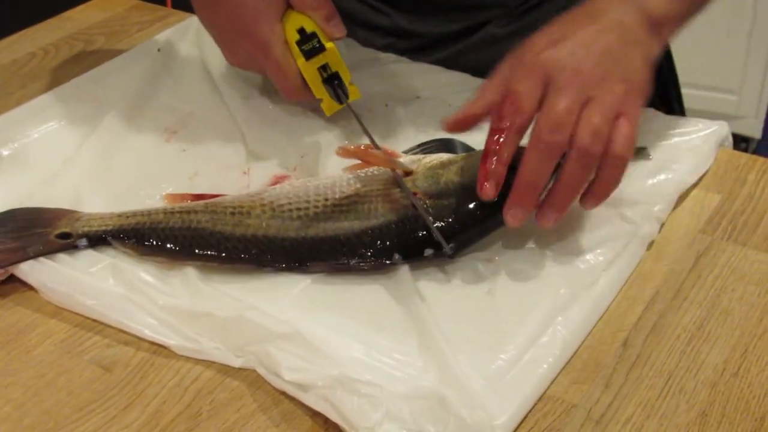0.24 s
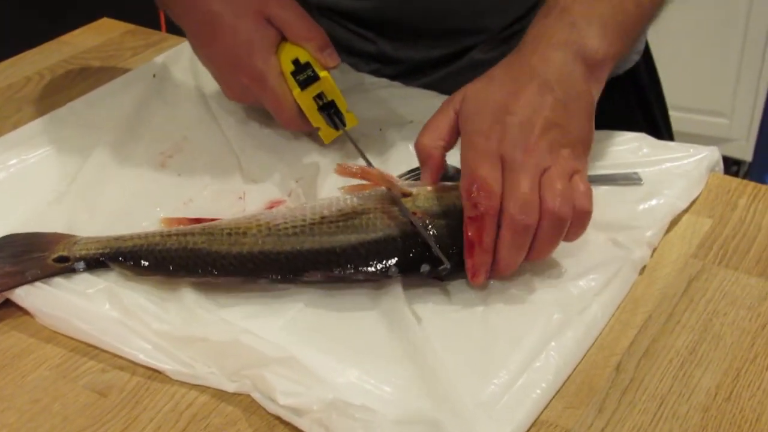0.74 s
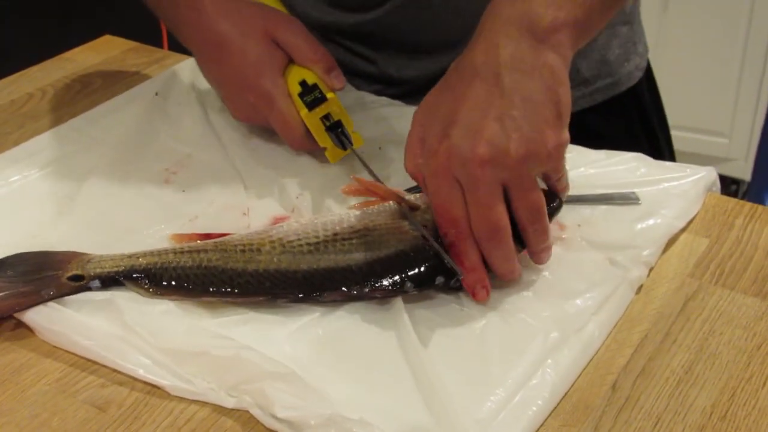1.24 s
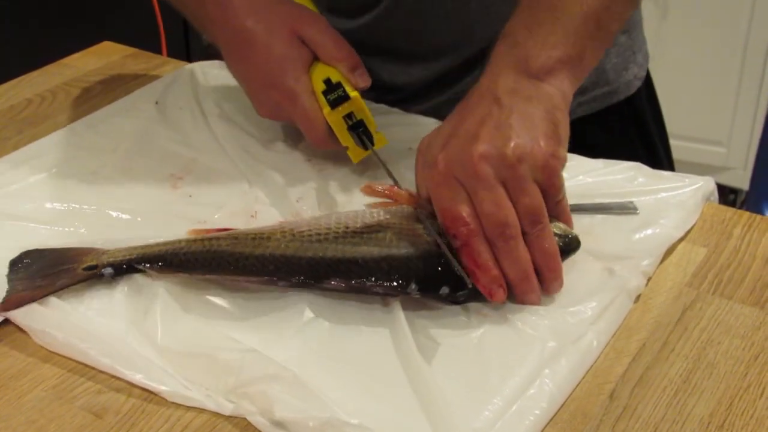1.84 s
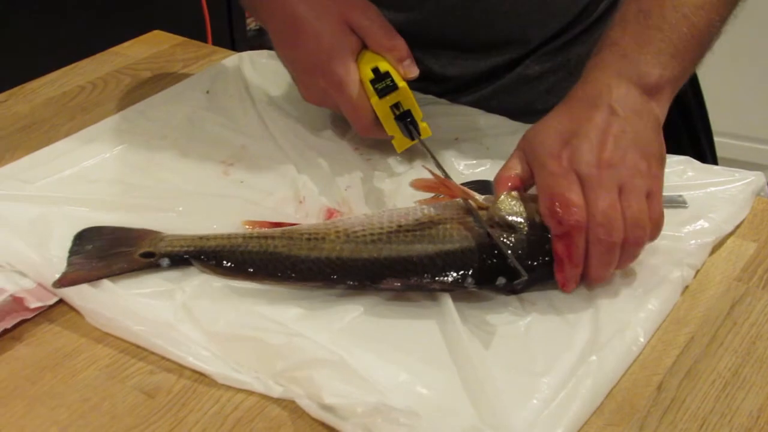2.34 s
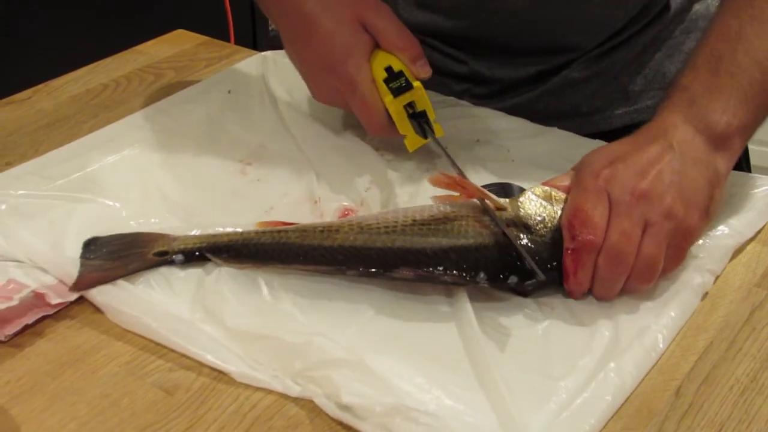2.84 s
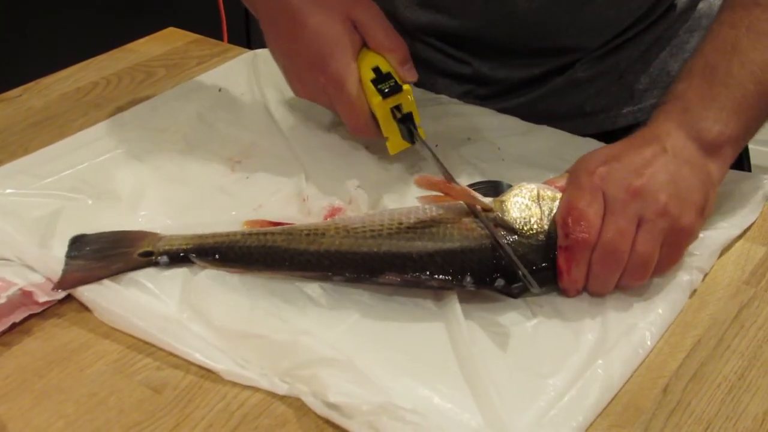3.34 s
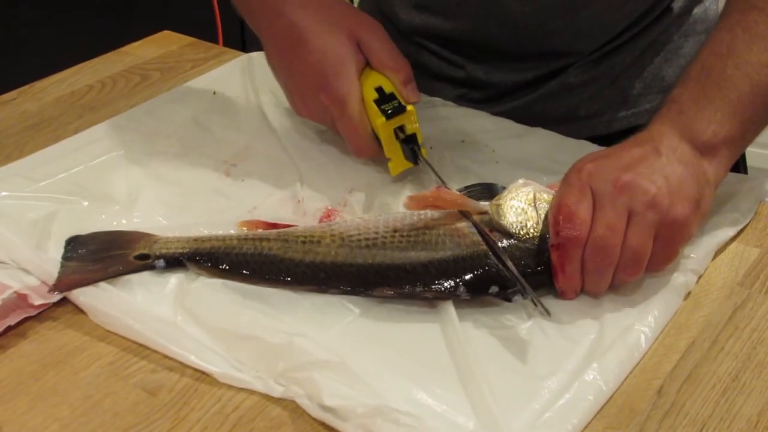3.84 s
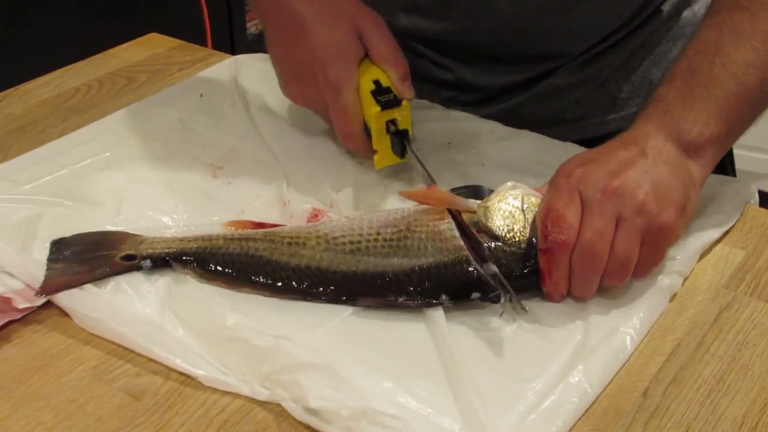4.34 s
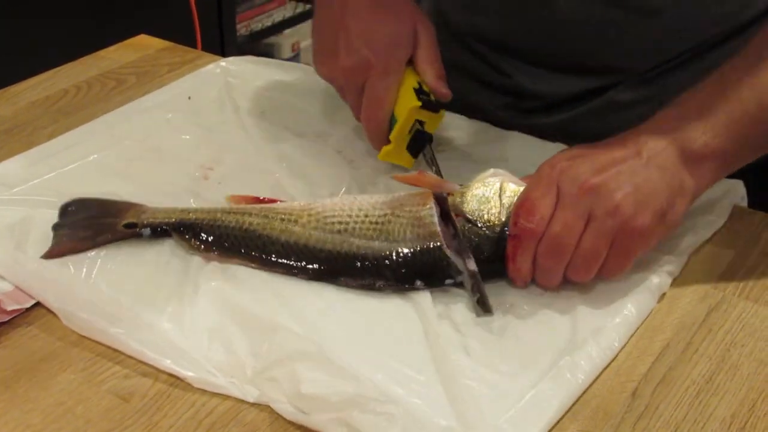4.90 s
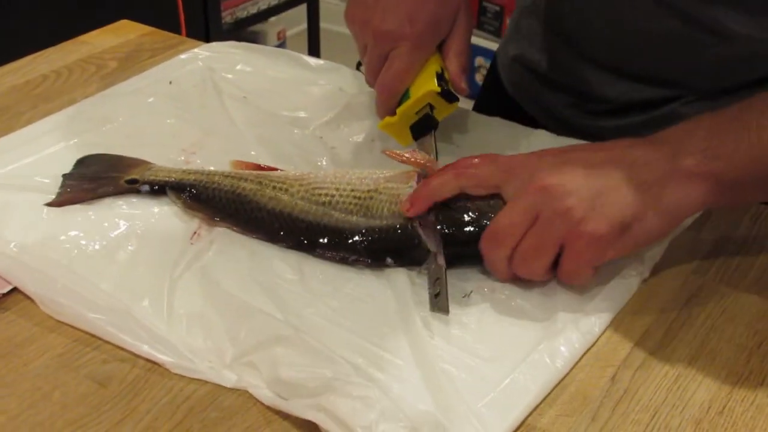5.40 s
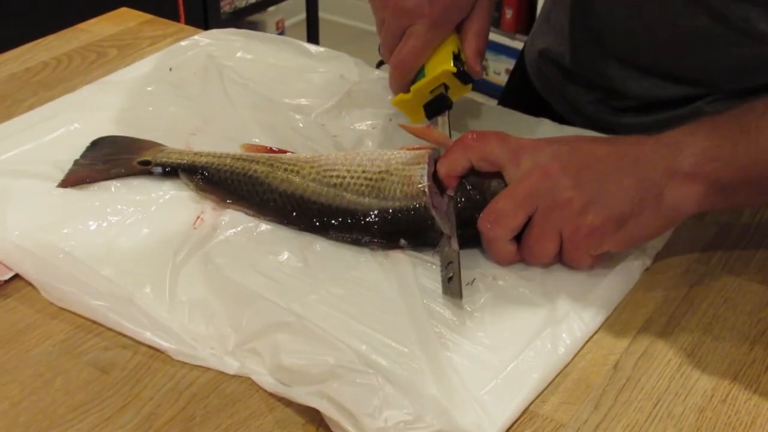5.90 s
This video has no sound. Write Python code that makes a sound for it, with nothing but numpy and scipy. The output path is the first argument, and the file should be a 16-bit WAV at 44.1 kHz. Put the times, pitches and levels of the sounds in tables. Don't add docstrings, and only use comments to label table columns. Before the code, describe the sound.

Close in a small kitchen, a corded electric knife coasts down, hands shift fish on crackling plastic, then short whining bursts saw and clatter before slowing.

```python
import sys
import numpy as np
from scipy import signal
from scipy.fft import rfft, irfft, next_fast_len
from scipy.io import wavfile
from scipy.ndimage import uniform_filter1d, map_coordinates

SR = 44100
rng = np.random.default_rng(int(sys.argv[2]) if len(sys.argv) > 2 else 0)


def volts_from_decibels(level):
    exponent = np.asarray(level, float) / 20
    return 10 ** exponent


def transcribe(u):
    v = np.clip(np.atleast_2d(u).T, -1, 1)
    q = np.round(v * 32767).astype(np.int16)
    wavfile.write(sys.argv[1], SR, q)


N = 271656

TOP_HZ = 15200
TOP_BARS_HZ = 3060
BARS_PER_STROKE, BARS_PER_TURN = 41, 12


def noise():
    return rng.standard_normal(N)


def unit(x):
    return x / np.sqrt(np.mean(x ** 2) + 1e-20)


def levelled(x):
    return x / np.sqrt(np.abs(uniform_filter1d(x ** 2, int(.06 * SR))) + 1e-12)


def along(points, hz):
    f, v = np.transpose(points)
    return np.interp(np.log(hz + 1), np.log(f + 1), v)


def curves(*tables):
    s, *cols = np.transpose(sorted(row for table in tables for row in table))
    t = np.arange(N) / SR
    sounds = sum((t > table[0][0] - .015) & (t < table[-1][0] + .015) for table in tables)
    return [np.where(sounds, np.interp(t, s, c), -100) for c in cols]


def swells(times, db, rise_s, fall_s):
    late = np.arange(0, N + 64, 64) / SR - np.array(times)[:, None]
    drop = np.where(late < 0, -late / np.abs(rise_s)[:, None], late / np.abs(fall_s)[:, None])
    power = np.sum(volts_from_decibels(db[:, None] - 20 * drop) ** 2, axis=0)
    return np.interp(np.arange(N), 64 * np.arange(len(power)), np.sqrt(power))


def wobble(rate_hz):
    coarse = np.arange(0, N + 16, 16)
    knots = rng.standard_normal(int(N * rate_hz / SR) + 4)
    return np.interp(np.arange(N), coarse, map_coordinates(knots, [coarse * rate_hz / SR]))


def filtered(x, response):
    m = next_fast_len(N + SR // 8, True)
    return irfft(rfft(x, m) * response(np.fft.rfftfreq(m, 1 / SR)), m)[..., :N]


def shaped(x, points):
    return filtered(x, lambda f: volts_from_decibels(along(points, f)))


def modes(table):
    return lambda f: sum((-1) ** k * volts_from_decibels(db) * 1j * f * w / (c * c - f * f + 1j * f * w)
                         for k, (c, w, db) in enumerate(table))


def bursts(times, sizes, t60):
    kicks = np.bincount(np.minimum((np.asarray(times) * SR).astype(int), N - 1), sizes, N)
    decay = signal.lfilter([1], [1, -volts_from_decibels(-60 / (t60 * SR))], kicks)
    return uniform_filter1d(decay, int(.0012 * SR))


def spread(mid, side, width):
    side = shaped(side, width)
    return np.array([mid + side, mid - side])


# pitch_hz, level_db
FRIDGE_HUM = [(123.8, -60.5), (242.2, -56.5), (296.1, -58.5), (419.9, -64.5)]


def fridge():
    t = np.arange(N) / SR
    return sum(volts_from_decibels(db + 1 + 2.0 * wobble(5.02)) * np.sin(2 * np.pi * hz * t + wobble(7.4))
               for hz, db in FRIDGE_HUM)


# freq_hz, density_db_per_hz
AIR_SPECTRUM = [(15, -46), (25, -20), (42, -18), (60, -6), (107, -3.5), (169, -3), (240, -1), (368, -4.5),
                (457, -0.5), (560, -4), (666, -25.5), (741, -11), (1110, -12), (1620, -23.5), (3170, -25.5),
                (10100, -26.5), (13200, -43), (15500, -39)]
# freq_hz, side_mid_db
AIR_WIDTH = [(60, 7.5), (180, 5.5), (550, -4), (1650, 0), (3500, -14), (7000, -4), (9000, -26),
             (15000, -22)]


def room_air():
    mid, side = shaped(rng.standard_normal((2, N)), AIR_SPECTRUM)
    return volts_from_decibels(-47 + 0.36 * wobble(3.3)) * unit(spread(mid, side, AIR_WIDTH))


# freq_hz, t60_s
KITCHEN_T60 = [(150, 0.64), (1000, 0.18), (10000, 0.11)]


def kitchen(x):
    hz, t, z = signal.stft(rng.standard_normal((2, SR // 2)), SR, nperseg=256)
    tail = signal.istft(z * volts_from_decibels(-60 * t / along(KITCHEN_T60, hz)[:, None]), SR, nperseg=256)[1]
    return signal.fftconvolve(x[None], tail / np.linalg.norm(tail[0]), axes=1)[:, :N]


# peak_s, rustle_db, rub_db, rise_s, fall_s (per 20 dB)
HAND_MOVES = [(1.134, -56, -58, 0.04, 0.3), (1.4, -60.5, -61.5, 0.41, 0.7), (1.536, -54, -56, 0.063, 0.05),
              (1.646, -52.5, -57.5, 0.074, 0), (1.77, -45.5, -49, 0.013, 0.06), (1.92, -46, -52, 0.25, 0.1),
              (2.005, -47, -47, .006, 0.1), (2.071, -42, -37, 0.013, 0.19), (2.248, -48, -52, .12, 0.45),
              (2.389, -41, -39, 0.042, 0.07), (2.412, -58, -51, .03, 0.27),
              (2.688, -44.5, -45.5, 0.083, .09), (2.803, -49, -45, 0.033, 0.1),
              (2.878, -47.5, -55, 0.17, 0), (5.474, -60, -59.5, 0.24, -2.5), (5.726, -56, -58, 0.026, 0),
              (5.79, -62, -62, 0.047, 0.6), (5.874, -58.5, -64, .08, 0.3)]
# freq_hz, density_db_per_hz
SHEET_SPECTRUM = [(1470, -7), (2500, 2), (5570, -6), (5970, 2), (9950, 1), (14400, -5.5), (15500, -20)]
# freq_hz, density_db_per_hz
RUB_SPECTRUM = [(350, -31), (600, -2.5), (698, -72), (756, -1), (927, 3.5), (1610, 0.5), (3570, -4.5),
                (5000, -3), (6500, -17), (11000, -120)]


def sheet_and_skin():
    s, rustle_db, rub_db, rise_s, fall_s = np.transpose(HAND_MOVES)
    crinkle = swells(s, rustle_db, rise_s, fall_s) + volts_from_decibels(-72)
    drag = swells(s, rub_db, rise_s, fall_s) + volts_from_decibels(-77)
    luck = rng.random((1500, 2))
    grains = 1 + .8 * bursts(luck[:, 0] * N / SR, volts_from_decibels(-3.5 * np.log(luck[:, 1] + .02)), t60=.004)
    rustle = levelled(shaped(grains * noise(), SHEET_SPECTRUM))
    rub = levelled(shaped(grains * noise(), RUB_SPECTRUM))
    return crinkle * rustle + drag * rub


# start_s, peak_db, pitch_hz, crack_db
SNAPS = [(0.948, -35, 1010, 14), (1.125, -44, 856, 17), (1.299, -47, 1140, -13), (1.402, -45, 950, -16),
         (1.538, -40.5, 986, -17), (1.63, -43, 1130, -17), (1.705, -41, 2200, -15), (1.721, -59, 880, -9),
         (1.765, -43, 1090, -12), (1.777, -46, 6000, 8), (1.843, -37, 6500, 4), (1.883, -37, 1810, -13),
         (1.912, -41.5, 1000, -11), (2.002, -32.5, 970, -8), (2.005, -33, 1740, -20),
         (2.066, -23.5, 2400, 11), (2.072, -20.5, 2100, 10), (2.076, -24, 2700, -9),
         (2.081, -26.5, 1550, -6), (2.087, -24, 3280, -6), (2.091, -26, 4480, -8), (2.127, -29, 3180, 5),
         (2.353, -33, 1900, -8), (2.358, -33, 830, -20), (2.393, -32, 1300, -20), (2.405, -40, 2640, -20),
         (2.475, -42, 1200, -15), (2.859, -51, 2130, -15), (2.38, -35, 1470, -13), (2.422, -34, 1420, -16),
         (2.683, -28, 986, -32), (2.69, -34, 2250, -18), (2.719, -41, 3000, -2), (2.556, -44, 5040, 14),
         (2.31, -50, 9500, 5), (2.5, -52, 8500, 8), (2.749, -52, 11000, 6), (2.845, -50, 8500, 4),
         (2.88, -47, 9000, 4), (2.748, -36, 975, -17), (2.798, -37.5, 930, -15), (2.823, -34, 2060, -14),
         (5.561, -48, 1230, -9), (5.723, -56.5, 1190, -9), (5.824, -43, 2040, -12)]


def sheet_and_bone_snaps():
    out, t = np.zeros(N + SR), np.arange(SR // 20) / SR
    for s, db, hz, crack_db in SNAPS:
        jitter = .5 * np.cumsum(rng.standard_normal(len(t))) / 12
        envelope = volts_from_decibels(-60 * t * hz / 45) * (1 - np.exp(-t * hz / 1.2))
        ring = 10 * envelope * np.sin(2 * np.pi * hz * t + jitter)
        grit = signal.lfilter([1, -.5], 1, rng.standard_normal(len(t) + 1))[1:]
        crack = volts_from_decibels(crack_db + 14) * volts_from_decibels(-60 * t / .005) * grit
        out[round(s * SR):][:len(t)] += volts_from_decibels(db - 21.0) * (ring + crack)
    return out[:N]


# start_s, level_db
THUDS = [
    (2.354, -28),
    (2.385, -27.5),
    (2.42, -41),
]


def head_thuds():
    s, db = np.transpose(THUDS)
    push = bursts(s, volts_from_decibels(db + 23.5), t60=0.0097) * (1 + 0.56 * noise())
    board = [(245, 19, -2.0), (308, 23, -11.0), (385, 33, -2.0), (520, 73, -17), (1300, 460, -14)]
    return filtered(push, modes(board))


# peak_s, length_s, drum_db, sway_db
LEANS = [(0.0, 0.018, -44, -56), (0.296, 0.036, -74, -58), (0.72, 0.21, -55, -65), (3.173, 0.038, -42, -64),
         (3.3, 0.078, -42, -51), (3.478, 0.15, -72, -51), (3.776, 0.081, -38, -51),
         (3.876, 0.052, -39, -53), (4.02, 0.082, -34.5, -44), (4.144, 0.09, -24, -54),
         (4.315, 0.069, -26, -45), (4.44, 0.085, -38, -38), (4.666, 0.065, -61, -48),
         (4.994, 0.13, -48.5, -81)]


def hand_leans():
    s, length_s, drum_db, sway_db = np.transpose(LEANS)
    lean = swells(s, drum_db, 2 * length_s, 2 * length_s)
    return lean, swells(s, sway_db, 2.0 * length_s, 0.59 * length_s)


def table_sway(lurch):
    return lurch * unit(filtered(noise(), lambda f: modes([(59, 22, 0)])(f) ** 3))


# freq_hz, width_hz, level_db
TABLE_MODES = [(87, 35, -17), (131, 9, -3.5), (175, 15, -5), (239.5, 18.7, -1), (342, 99, -9.5)]


def table_shake(turn, knocks):
    unbalance = np.sin(2 * np.pi * turn / BARS_PER_TURN + 1.3 * wobble(25))
    return levelled(filtered(noise() + .5 * knocks + .14 * unbalance, modes(TABLE_MODES)))


# freq_hz, density_db_per_hz
HOUSING_SPECTRUM = [(150, -24), (250, -8.5), (376, -5.5), (437, -3.5), (610, -4), (690, -10.5), (752, -1.5),
                    (807, -1), (1150, -2.5), (1400, -7.5), (1760, -7.5), (2970, -53)]
# freq_hz, width_hz, level_db
SHELL_MODES = [(450, 38, -4.5), (630, 9.2, -4.5), (765, 9.7, 4.5), (852, 24, -5.5), (1040, 44, -2.5),
               (1184, 31, -1.5), (1370, 41, -4.5), (1496, 59, -4.5), (2200, 210, -2), (2530, 380, -3),
               (2830, 100, -5)]


def shell(f):
    return 1 + np.abs(modes(SHELL_MODES)(f))


def housing(f):
    return volts_from_decibels(along(HOUSING_SPECTRUM, f)) * shell(f)


# start_s, peak_db, sharp_db
SLOW_STROKES = [(0.438, -19, -16), (0.488, -18.5, -12), (0.517, -21, -14), (0.541, -24, -13),
                (0.573, -29, 1), (0.604, -21, -2), (0.637, -30, -2), (0.671, -20.5, -6), (0.709, -24, -6),
                (0.752, -18, -12), (0.801, -22, -9), (0.856, -18, -8), (0.923, -21.5, -19),
                (1.027, -31.5, -14), (1.07, -37, -19), (4.791, -24, -15), (4.816, -23, -4),
                (4.848, -16.5, -14), (4.898, -27, 0), (4.925, -21.5, -2), (4.963, -26, 0),
                (4.992, -20.5, -2), (5.031, -18.5, -10), (5.074, -19.5, -13), (5.126, -22.5, -21),
                (5.183, -20, -16), (5.24, -37, -6.5), (5.275, -26.5, -17)]


def slow_strokes():
    s, db, sharp_db = np.transpose(SLOW_STROKES)
    thump = unit(filtered(noise(), housing))
    ring = modes([(700, 500, -3), (1500, 800, 0), (2300, 800, 0), (3000, 500, -1)])
    edge = unit(filtered(noise(), lambda f: ring(f) * (f < 3600)))
    return bursts(s, volts_from_decibels(db - 9.5), t60=0.096) * thump + bursts(s, volts_from_decibels(db + sharp_db + 3.0), t60=0.014) * edge


# start_s, peak_db, tick_db
FIRM_KNOCKS = [(0.029, -5, -37), (0.1505, -29, -35), (0.228, -23, -44), (0.2656, -25, -41),
               (0.305, -29, -40), (0.348, -29, -35), (0.3827, -33, -45), (3.025, -24, -54),
               (3.057, -17, -53), (3.087, -33, -34), (3.132, -12, -39), (3.1766, -7, -27),
               (3.2188, -17, -32.5), (3.253, -19, -32), (3.3166, -15, -41), (3.3458, -23, -37),
               (3.3788, -21, -45), (3.3974, -27, -40), (3.4158, -6, -41), (3.433, -24, -46),
               (3.453, -7, -43), (3.472, -6, -44), (3.535, -20, -29), (3.5827, -13, -39), (3.609, -19, -40),
               (3.6717, -23, -31), (3.7258, -15, -38), (3.7468, -4, -36), (3.764, -5, -34),
               (3.7985, -16, -36), (3.899, -13, -36), (3.93, -18, -40), (3.9612, -17, -31),
               (3.9773, -4, -28), (4.0218, -7, -40), (4.0506, -19, -45), (4.081, -3, -37), (4.0948, 1, -35),
               (4.1114, -14, -18.5), (4.1387, 0.5, -25), (4.166, -1, -28), (4.1807, -4, -31),
               (4.1982, -21, -17.5), (4.226, -8, -20), (4.2504, -5, -25), (4.28, -5, -21),
               (4.3067, -4, -23), (4.3307, -4, -22), (4.3467, -7, -23), (4.3626, -23, -23),
               (4.3901, -7, -20), (4.4668, -8, -29), (4.4815, -11, -30), (4.6216, -35, -28),
               (4.66, -12, -32), (4.6968, -18, -27), (4.745, -17, -34)]


def firm_knocks():
    s, db, tick_db = np.transpose(FIRM_KNOCKS)
    clack = unit(filtered(noise(), modes([(1440, 280, 1.0), (1990, 250, 0.0), (2770, 560, -5.5)])))
    tick = unit(filtered(noise(), lambda f: modes([(8200, 2500, 0), (12300, 3000, 0)])(f) ** 2))
    return bursts(s, volts_from_decibels(db - 12), t60=0.021) * clack + bursts(s, volts_from_decibels(tick_db + 2.5), t60=0.011) * tick


def blade_reversals(bars, turn):
    firm_s = np.sort([row[0] for row in [*FIRM_KNOCKS, *SLOW_STROKES]])
    firm = turn[(firm_s * SR).astype(int)] / BARS_PER_STROKE
    count = np.cumsum(np.round(np.diff(firm, prepend=0)))
    crank = np.interp(turn / BARS_PER_STROKE, firm, count)
    stroke = np.flatnonzero(np.diff(np.floor(crank)) * (bars[1:] > 1500))
    luck = rng.standard_normal((400, 2))[:len(stroke)]
    late_s = 0.0005 * np.abs(luck[:, 0])
    return bursts(stroke / SR + late_s, volts_from_decibels(2.2 * np.clip(luck[:, 1], -3, 1.3)), t60=.03)


def gear_rasp(knocks):
    return levelled(filtered((1 + 0.11 * knocks) * noise(), housing))


# freq_hz, density_db_per_hz
BLADE_SPECTRUM = [(790, -30), (1350, -1.5), (1410, -2.5), (1850, -3), (2060, -4), (2790, -10), (2920, -4.5),
                  (3550, -16), (4500, -13), (5850, -22.5), (9900, -120)]


def blade_chatter(knocks):
    return levelled(filtered((1 + 1.2 * knocks) * noise(), lambda f: volts_from_decibels(along(BLADE_SPECTRUM, f)) * shell(f)))


# freq_hz, density_db_per_hz
HISS_SPECTRUM = [(2060, -25), (3500, -1), (4430, -1), (5280, -4), (5760, -1.5), (6400, -1), (7960, 0.5),
                 (8630, -1), (10100, 2), (12100, -4), (14700, -3.5), (15500, -16)]


def brush_hiss(knocks):
    return levelled(shaped((1 + 0.46 * knocks) * volts_from_decibels(0.97 * wobble(200)) * noise(), HISS_SPECTRUM))


def blade_socket(knocks, power, effort_db, speed_db):
    ring = filtered((1 + 0.67 * knocks) * noise(), lambda f: modes([(1490, 260, 0)])(f) ** 2)
    grip = np.abs(uniform_filter1d(power * (np.arange(N) / SR > 1), size=15000))
    return grip * volts_from_decibels(effort_db - 11 - 0.68 * speed_db) * levelled(ring)


def bar_tone(turn, k, rough=1):
    smear = rough * (.65 + .2 * k) * wobble(220) + 1.1 * np.sqrt(k) * wobble(70)
    return volts_from_decibels(2.5 * wobble(45)) * np.sin(2 * np.pi * k * turn + smear)


# bar_rate_multiple, level_db
FAN_TONES = [(4, -41), (6, -48), (8, -49)]


def rotor_fan(bars, turn):
    tones = 0
    for k, db in FAN_TONES:
        hz = k * bars
        carries = (hz < TOP_HZ) * np.minimum(hz / 8000, 1) ** 3.0 * np.minimum(11500 / hz, 1) ** 6
        tones = tones + volts_from_decibels(db) * bar_tone(turn, k, rough=0.62) * carries
    return (bars / 2900) ** 0.11 * (bars > 1100) * tones


# bar_rate_multiple, level_db
WHINE_TONES = [(1, 0), (2, -3), (3, -8), (4, -14)]
# freq_hz, gain_db
RADIATION = [(500, -2), (1000, 4), (1450, 4), (1850, -5), (2300, 1), (2700, 8.5), (3000, 7), (3400, -3),
             (4300, -3), (5200, -4), (5900, -5), (9000, -13)]


def commutator_whine(turn, whine_db):
    mains_beat = 1 + 0.29 * np.sin(2 * np.pi * 120 * np.arange(N) / SR)
    whine = volts_from_decibels(whine_db) * mains_beat * sum(volts_from_decibels(db) * bar_tone(turn, k) for k, db in WHINE_TONES)
    whine = whine * (1 + .45 * np.sin(2 * np.pi * turn / BARS_PER_TURN))
    return shaped(whine, RADIATION)


# on_s, off_s, spin_up_s, flesh_drag_hz (bar rate lost on release), whine_db
PULLS = [
    (-1.0, 0.0, .35, 260, -56),
    (2.876, 3.003, .178, 250, -40),
    (3.076, 3.365, .203, 700, -35),
    (3.618, 4.385, .26, 450, -35.5),
    (6.12, 6.2, .13, 0, -56),
]


def motor():
    friction_hz_per_s, bite_s, grip_hz = 2250, .12, 700
    t = np.arange(N) / SR
    bars, whine_db, power, left = np.zeros(N), np.full(N, -100.), np.zeros(N), 0
    ends_s = [row[0] for row in PULLS[1:]] + [t[-1] + 1]
    for (on, off, spin_s, bite_hz, db), after in zip(PULLS, ends_s):
        climb = lambda s: TOP_BARS_HZ - (TOP_BARS_HZ - left) * np.exp(-(s - on) / spin_s)
        lost = lambda s: friction_hz_per_s * s + bite_hz * (1 - np.exp(-s / bite_s))
        coast = lambda s: np.maximum(climb(off) - lost(s), 100)
        up, down = (t >= on) & (t < off), (t >= off) & (t < after)
        bars[up], bars[down], power[up] = climb(t[up]), coast(t[down] - off), 1
        inrush_db = 13 * (1 - bars[up] / TOP_BARS_HZ)
        whine_db[up] = db + inrush_db + 40 * np.log10(np.minimum(bars[up] / grip_hz, 1))
        idle_db = -58 + 1.2 * 20 * np.log10(bars[down] / TOP_BARS_HZ)
        whine_db[down] = np.maximum(db - 400 * (t[down] - off), idle_db)
        left = coast(after - off)
    return bars, uniform_filter1d(whine_db, size=300), uniform_filter1d(power, size=1500)


# time_s, level_db
POWERED_EFFORT = [
    [(2.89, -55), (2.9, -38.5), (2.924, -27), (2.988, -28), (3.014, -30), (3.07, -30.5)],
    [(3.075, -33), (3.085, -27.5), (3.159, -28.5), (3.181, -24.5), (3.195, -25.5), (3.439, -22),
     (3.579, -27), (3.585, -24.5), (3.6, -34)],
    [(3.61, -25.5), (3.818, -23), (3.822, -24.5), (4.108, -18.5), (4.148, -23.5), (4.314, -19.5),
     (4.45, -24)],
]
# time_s, level_db
COASTING_EFFORT = [
    [(0.0, -23), (0.68, -38.5), (0.788, -39), (1.05, -49.5), (1.12, -59)],
    [(4.47, -26), (4.84, -30.5), (5.008, -34.5), (5.15, -39.5), (5.308, -47), (5.42, -55.5)],
]
# time_s, level_db
RESTART_EFFORT = [
    (6.12, -68),
    (6.148, -39.5),
    (6.16, -34),
]


def knife():
    bars, whine_db, power = motor()
    turn = np.cumsum(bars) / SR
    effort_db, = curves(*POWERED_EFFORT, *COASTING_EFFORT, RESTART_EFFORT)
    running = effort_db > -99
    speed_db = 20 * np.log10(bars / TOP_BARS_HZ + 0.05)
    lean, lurch = hand_leans()
    knocks = blade_reversals(bars, turn)
    drift_db = wobble(24.955)
    rasp_db = effort_db - 3.5 + power * (-0.5 + 0.3 * speed_db) + drift_db
    chatter_db = effort_db - 5.5 + power - drift_db
    hiss_db = -25.5 + 0.32 * effort_db - 2.2 * power + 0.73 * speed_db
    brush = running * volts_from_decibels(hiss_db) + 0.45 * lean
    drum = running * volts_from_decibels(-39 + 0.57 * effort_db) + lean
    tones = commutator_whine(turn, whine_db) + rotor_fan(bars, turn)
    gears = volts_from_decibels(rasp_db) * gear_rasp(knocks) + blade_socket(knocks, power, effort_db, speed_db)
    blades = volts_from_decibels(chatter_db) * blade_chatter(knocks) + slow_strokes() + firm_knocks()
    table = drum * table_shake(turn, knocks) + table_sway(lurch)
    return tones + gears + blades + brush * brush_hiss(knocks) + table


# freq_hz, side_mid_db
NEAR_WIDTH = [(60, -18), (120, -12), (240, -18.5), (950, -13), (1900, -13.5), (3500, -18), (5500, -7),
              (7500, -5), (10000, -3.5), (15000, 0)]


def scene():
    near = knife() + sheet_and_skin() + sheet_and_bone_snaps() + head_thuds()
    echo, other = kitchen(near)
    return spread(near + volts_from_decibels(-8.0) * echo, volts_from_decibels(-2.5) * other, NEAR_WIDTH) + room_air() + fridge()


def band_limit(x):
    return signal.sosfilt(signal.butter(12, 15900, fs=SR, output="sos"), x)


# freq_hz, left_right_db
PORT_BALANCE = [(60, 0.5), (240, 3), (950, 0.5), (3770, 0), (15000, 0.5)]


def record(dry):
    halves = np.array([[.5], [-.5]])
    ports = filtered(dry, lambda f: volts_from_decibels(along(PORT_BALANCE, f) * halves) * (f < TOP_HZ))
    return band_limit(ports)


dry = scene()
out = record(dry)
transcribe(out)
```